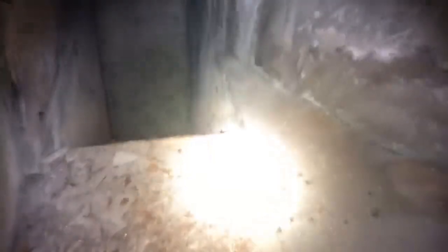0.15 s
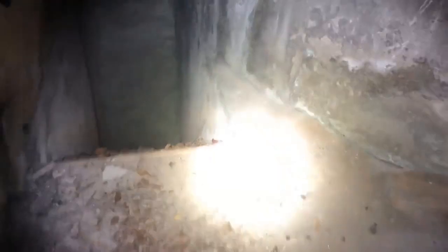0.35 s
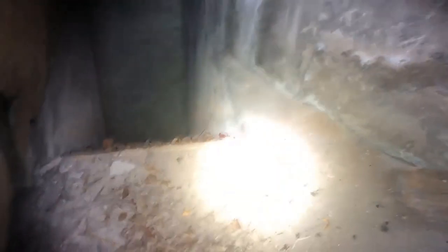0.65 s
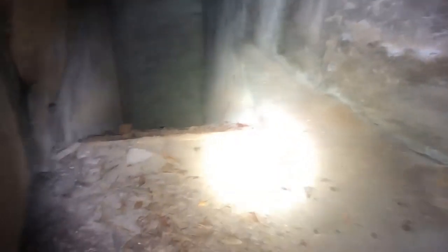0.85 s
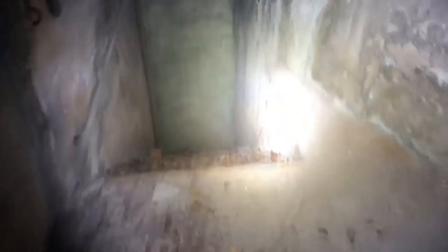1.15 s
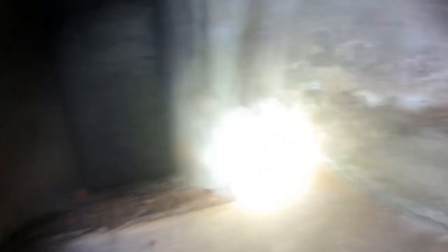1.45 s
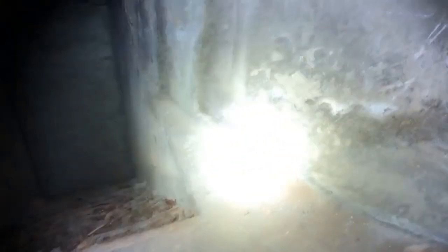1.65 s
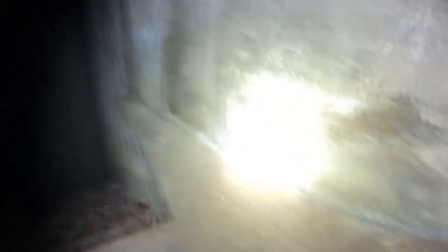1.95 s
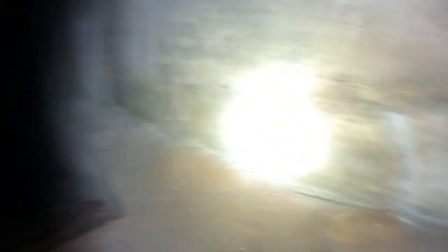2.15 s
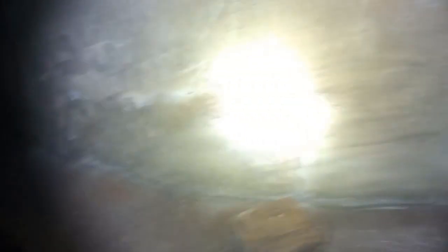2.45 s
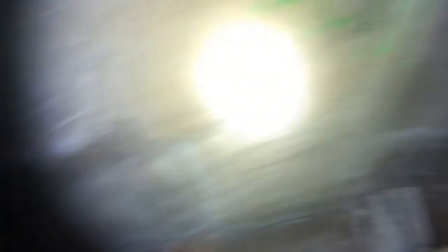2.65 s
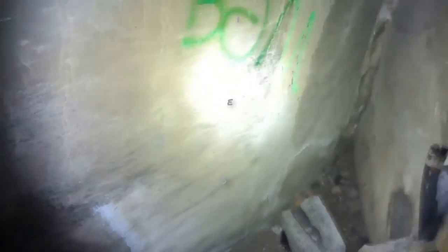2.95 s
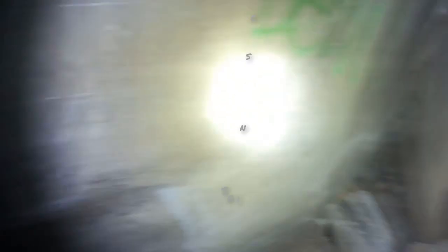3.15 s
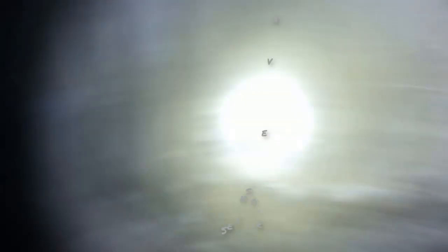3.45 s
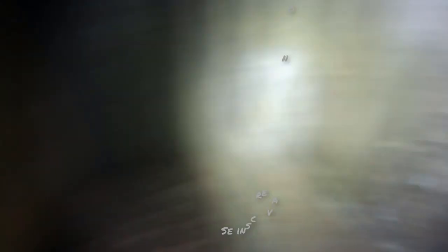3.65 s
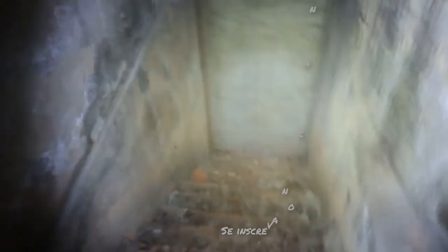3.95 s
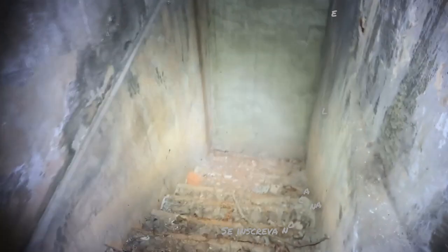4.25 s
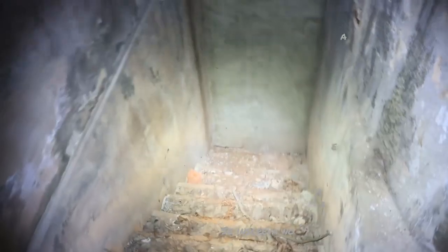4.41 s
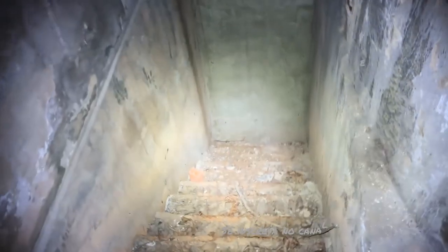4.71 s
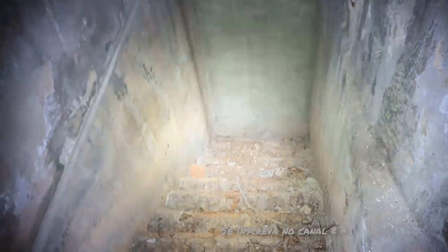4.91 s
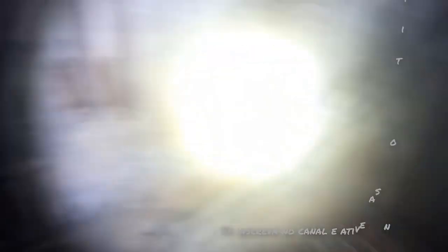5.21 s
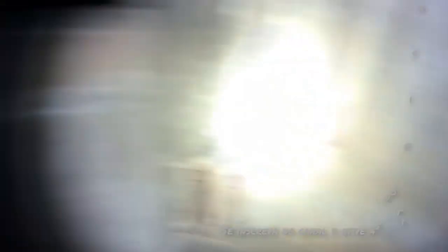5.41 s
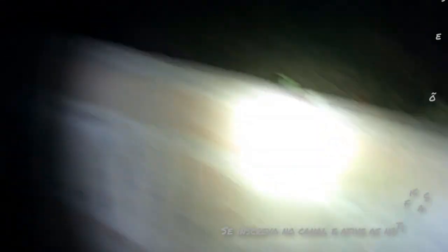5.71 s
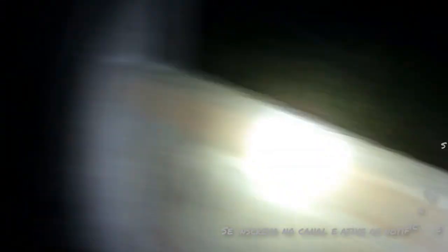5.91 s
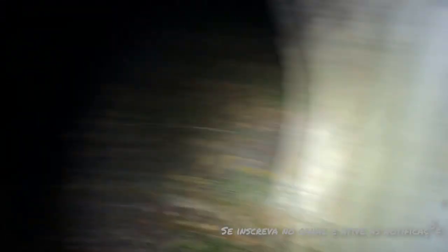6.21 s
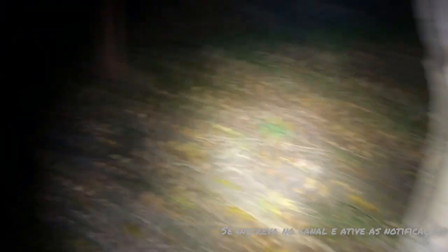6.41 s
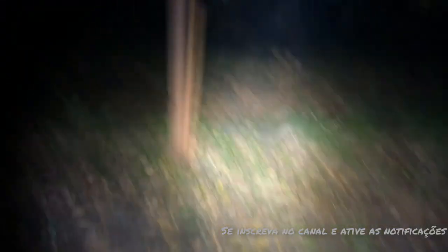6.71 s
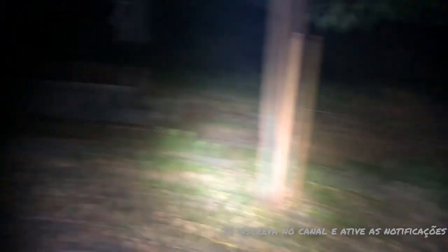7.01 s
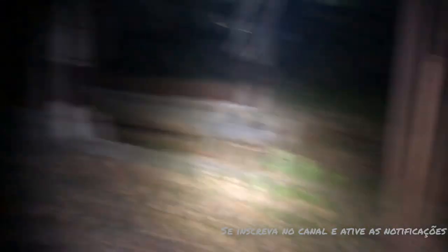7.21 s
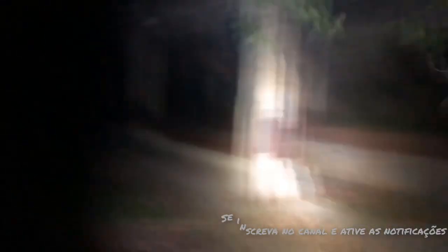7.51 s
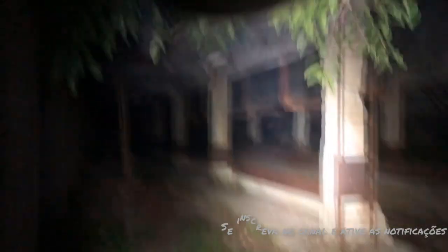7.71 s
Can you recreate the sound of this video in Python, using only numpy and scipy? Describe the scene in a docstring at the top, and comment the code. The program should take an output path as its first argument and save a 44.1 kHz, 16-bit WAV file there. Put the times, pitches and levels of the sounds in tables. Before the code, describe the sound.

Uneven footsteps crunch over rubble, twigs and dry leaves, with sharp little snaps and a faint low hum underneath.

```python
"""A wide crunch dies away, then footsteps go on in the middle, over rubble, twigs and dry leaves at night.
Each step crushes many small grains and rings the gap under the sole; some heels thump softly.
Twigs and chips snap singly, and bare walls answer with a short tail.
Under the quiet air a low hum wavers, with a few faint, thin tones."""
import sys
import numpy as np
from scipy import signal
from scipy.io import wavfile
from scipy.ndimage import uniform_filter1d

SR = 44100
rng = np.random.default_rng(int(sys.argv[2]) if len(sys.argv) > 2 else 0)


def wav_record(signal):
    """Record a signal, one row per channel, as 16-bit PCM in the file named by sys.argv[1]."""
    frames = np.transpose(np.atleast_2d(signal))
    bounded = np.clip(frames, -1, 1)
    # unit amplitude maps onto the largest positive 16-bit level
    quanta = np.round(bounded * 32767).astype(np.int16)
    wavfile.write(sys.argv[1], SR, quanta)


N = 346626
TIME_S = np.arange(N) / SR
EVENT_SAMPLES = 4000


def gain_of(db):
    """Decibels to gain."""
    return 10 ** (np.asarray(db) / 20)


def unit_rms(x):
    """Scales to rms 1."""
    return x / np.sqrt(np.mean(x ** 2) + 1e-20)


def at_pitch(points, hz):
    """Interpolates (hz, value) points on a log-frequency axis."""
    known_hz, values = np.transpose(points)
    return np.interp(np.log(hz + 1), np.log(known_hz + 1), values)


def follow(points):
    """Interpolates (time_s, value) points at each sample."""
    return np.interp(TIME_S, *np.transpose(points))


def drift(rate_hz):
    """Low-passed noise of rms 1."""
    lowpass = signal.butter(2, rate_hz, fs=SR, output="sos")
    return unit_rms(signal.sosfilt(lowpass, rng.standard_normal(N)))


def resonate(x, hz, width_hz):
    """Two-pole resonance."""
    r = np.exp(-np.pi * width_hz / SR)
    return signal.lfilter([1 - r, 0, r - 1], [1, -2 * r * np.cos(2 * np.pi * hz / SR), r * r], x)


# Ground giving way: full_load_s, rise_s, hold_s, leaves_db, fall_db_per_s,
# grit_re_leaves_db, fizz_re_leaves_db, hollow_hz
CRUSHES = [(0, 0.001, 0.015, -30.5, 287, -0.5, 3, 726), (0.177, 0.068, 0.0, -42.5, 386, -25, -8, 920.0),
           (0.31, 0.13, 0.016, -51.5, 97, -5, -8, 870), (0.46, 0.018, 0.11, -59.5, 440.0, -2.5, -15.5, 700),
           (0.801, 0.004, 0.039, -52.5, 317, -8, -23, 745), (0.945, 0.011, 0, -52, 310, 5, -3.5, 785),
           (1.13, 0.0059, 0.014, -45, 290, 0, -4.5, 1000),
           (1.282, 0.0022, 0.00028, -46, 508.5, -20, -7, 860.0),
           (1.337, 0.0037, 0.094, -39.5, 128, 1, 0, 920), (1.387, 0.045, 0.054, -29.5, 206, -5, -4, 695),
           (1.493, 0.022, 0.0093, -31, 379, -6.5, 1.5, 583),
           (1.63, 0.028, 0.026, -45.5, 145, -2.5, -11.5, 780),
           (1.79, 0.055, 0.036, -50, 286, -8.5, -8.5, 930), (1.956, 0.21, 0.0081, -55, 174, -2, -5, 940),
           (2.13, 0.11, 0.027, -54.5, 98, -24, -9.5, 740), (2.23, 0.033, 0.011, -60.5, 193, -12, -4, 800),
           (2.48, 0.05, 0.014, -54.5, 533, -18, -10, 785), (2.747, 0.096, 0.008, -57.5, 287, -21, -10, 864),
           (2.807, 0.008, 0.09, -56.5, 100.5, 3, -9, 900), (2.839, 0.0065, 0.019, -40, 103, 1, -4, 1110),
           (2.897, 0.046, 0.089, -49, 214, 6, -2.5, 880), (3.306, 0.14, 0.0085, -48.5, 159, -3, -3, 960),
           (3.402, 0.095, 0.013, -51, 228, -2.5, -2.5, 1020),
           (3.554, 0.004, 0.028, -56.5, 268, -9, -5, 910.0), (3.796, 0.005, 0, -63, 139, -7, -9.5, 850),
           (3.89, 0.033, 0.16, -64.5, 52, -2, -5, 875), (3.984, 0.024, 0.04, -49, 298, 8, -8, 760),
           (4.088, 0.034, 0.15, -57.5, 150.5, 1, -9.5, 990),
           (4.316, 0.06, 0.036, -54, 209, 1.5, -6.5, 1140), (4.472, 0.05, 0.04, -44, 265, -4.5, -6.5, 1080),
           (4.671, 0.0049, 0.012, -54, 506, -0.5, -26, 990),
           (4.852, 0.043, 0.052, -63, 240, -15, -7.5, 880),
           (5.137, 0.023, 0.048, -60.5, 133, -10, -5.5, 870.0), (5.26, 0.016, 0, -55.5, 249, -24, -10, 900),
           (5.425, 0.03, 0, -60, 594, -18, -4, 806), (5.675, 0.0018, 0.02, -47, 364, 2.5, -13.5, 1010),
           (5.755, 0.019, 0.0, -51, 101.5, 3.5, -15, 1000), (5.942, 0.064, 0.17, -58, 110, 3.5, -22, 1020),
           (6.099, 0.004, 0.057, -49.5, 169, 8, -13.5, 1130),
           (6.148, 0.0075, 0.008, -43, 267, -5, -10, 1350), (6.348, 0.0055, 0, -51, 133, 5, -14.5, 1480),
           (6.538, 0.064, 0.19, -59, 46, 9.5, -22, 1060), (6.761, 0.0065, 0.05, -50, 102, -10, -3.5, 1010),
           (6.826, 0.036, 0.02, -35, 225, -4.5, -1, 950), (6.939, 0.033, 0.014, -41.5, 282, -10, 2, 875),
           (7.14, 0.063, 0, -58, 59, -1, -4.5, 800), (7.331, 0.083, 0, -57.5, 43, 0.5, -8, 1000),
           (7.423, 0.035, 0.13, -49, 104, -8, -9.5, 860), (7.602, 0.043, 0.044, -43.5, 292, -3, -6.5, 1010),
           (7.68, 0.0099, 0.0013, -52, 107.5, 2, -4, 970), (7.726, 0.015, 0.22, -58.5, 95, 0.5, -3, 984)]


def foot_load():
    """Each crush rises, holds, falls and settles; returns the three debris levels and the hollow pitch."""
    rise_db, settle_speed = 17, 0.35
    sink_share, sink_s = 0.2, 0.18
    t = np.arange(0, N + 32, 32) / SR
    full_s, rise_s, hold_s, level_db, fall_db_per_s, grit, fizz, hz = np.transpose(CRUSHES)[:, :, None]

    def power(offset_db, fall_speed, lag_s=0, settle_db=-7):
        """Power per crush: the collapse plus the heap's fainter, slower settling."""
        since_s = t - full_s - lag_s * (full_s > 0)
        top_db = level_db + offset_db + rise_db * np.minimum(since_s, 0) / np.maximum(rise_s, 0.001)
        lost_db = fall_speed * fall_db_per_s * np.maximum(since_s - hold_s, 0)
        return gain_of(top_db - lost_db) ** 2 + gain_of(top_db + settle_db - settle_speed * lost_db) ** 2

    # Coarse grit gives way late and keeps rolling; fine fizz stops sooner.
    powers = power(0, 1), power(grit, 0.97, lag_s=0.009, settle_db=-8.5), power(fizz, 1.39)
    rests = gain_of([-79.5, -90.5, -91]) ** 2  # between steps
    leaves_db, grit_db, fizz_db = (10 * np.log10(p.sum(0) + rest) for p, rest in zip(powers, rests))
    # The hollow pitch drops as the foot presses the heap shut; crushes count by their grit power.
    sunk_hz = hz * (1 - sink_share * (1 - np.exp(-np.maximum(t - full_s, 0) / sink_s)))
    hollow_hz = ((powers[1] * sunk_hz).sum(0) + 700 * rests[1]) / gain_of(grit_db) ** 2
    curves = leaves_db, grit_db - leaves_db, fizz_db - leaves_db, hollow_hz
    return [np.interp(TIME_S, t, curve) for curve in curves]


# Grain spectrum: pitch_hz, level_db
GRAIN_SPECTRUM = [(300, -2.5), (550, -4.5), (900, -10), (1600, -0.5), (3000, -1.5), (5000, 1.5), (8000, 0),
                  (12000, 5), (15500, -2)]


def crunch(leaves_db, grit_db, fizz_db, hollow_hz):
    """Grains of many pitches break in clumps; grit sets the low end, fizz the top, relative to leaves."""
    grain_cycles, spread_db = 3.94, 0.94
    anchors_hz = 750, 3300, 11000  # grit, leaves, fizz
    clumps_db = 1.5 * drift(61)
    crowd = np.clip(gain_of(0.6 * (leaves_db + 54.5)), 1.1, 4)  # more load breaks more grains at once
    out = np.zeros(N)
    for hz in np.geomspace(310, 15500, 26):
        sizes = gain_of(spread_db * np.minimum(rng.exponential(1, N), 3)) * rng.standard_normal(N)
        t = np.arange(round(grain_cycles * SR / hz) + 4) / SR
        grain = np.sin(2 * np.pi * hz * t) * np.sin(np.pi * np.sqrt(t / t[-1])) ** 2
        breaks_per_s = 900 * crowd * (hz / 3000) ** 0.7
        breaks = rng.random(N) < breaks_per_s / SR
        train = signal.oaconvolve(sizes * breaks / np.sqrt(crowd), grain)[:N]
        grit_share = at_pitch(list(zip(anchors_hz, (0.99, 0.026, 0.085))), hz)
        fizz_share = at_pitch(list(zip(anchors_hz, (0.2, 0.033, 0.96))), hz)
        band_db = at_pitch(GRAIN_SPECTRUM, hz) + grit_share * grit_db + fizz_share * fizz_db
        # Grains near the hollow pitch sound louder; those below it radiate poorly.
        below = np.log(hollow_hz / hz)
        hollow_db = 2.94 * np.exp(-(below / 0.45) ** 2) - 7 * np.maximum(below, 0)
        patch_db = min(hz / 2500, 1) * clumps_db + 2 * drift(40.5)  # fine grains clump together
        out += unit_rms(train * gain_of(patch_db)) * gain_of(band_db + hollow_db)
    return gain_of(leaves_db - 9.5) * (out + hollow_ring(out, grit_db, hollow_hz))


def hollow_ring(grains, grit_db, hollow_hz, width_hz=200):
    """The gap under the sole rings at a moving pitch; coarser grit excites it more."""
    carrier = np.exp(2j * np.pi * np.cumsum(hollow_hz) / SR)
    r = np.exp(-np.pi * width_hz / SR)
    ring = 2 * (carrier * signal.lfilter([1 - r], [1, -r], grains / carrier)).real
    return gain_of(3 + 0.6 * np.minimum(grit_db, 6)) * ring


# Heel strikes: start_s, level_db, pitch_hz
HEELS = [(0.0, -32.5, 199), (0.012, -24, 600), (0.017, -30.5, 337), (0.726, -40, 120),
         (1.175, -40.5, 137.5), (1.244, -37, 102), (1.326, -38.5, 139), (1.473, -34, 182),
         (3.991, -37, 340), (6.037, -41.5, 116), (6.826, -41.5, 189), (7.15, -40.5, 115), (7.519, -43, 152),
         (7.617, -36.5, 145), (7.734, -40.5, 164)]


def heel_thumps():
    """A heel lands softly: one quickly damped low tone."""
    out = np.zeros(N + EVENT_SAMPLES)
    t = np.arange(EVENT_SAMPLES) / SR
    envelope = t / 0.0049 * np.exp(1 - t / 0.0034)
    for start_s, level_db, pitch_hz in HEELS:
        thump = gain_of(level_db) * envelope * np.sin(2 * np.pi * pitch_hz * t)
        out[round(start_s * SR):][:EVENT_SAMPLES] += thump
    return out[:N]


# Air spectrum: frequency_hz, relative_density_db
AIR_SPECTRUM = [(15, -42.5), (25, 4), (72, 8.5), (134, -7), (206, -5), (405, -12), (451, -13.5),
                (1290, -16.5), (2280, -26.5), (3160, -34), (10700, -40), (14800, -47), (16000, -67.5)]


def night_air(rms_db=-58.5, patch_db=1.6):
    """Quiet, dark noise with patches drifting in level, thinned below 110 Hz."""
    hz = np.fft.rfftfreq(1024, 1 / SR)
    real, imag, patches = rng.standard_normal((N // 256 + 5, len(hz), 3)).T
    patches = unit_rms(uniform_filter1d(uniform_filter1d(patches, 12, axis=0), 14, axis=1))
    shape = gain_of(at_pitch(AIR_SPECTRUM, hz)) * np.where(hz > 110, 1, 0.3)
    spectrum = (real + 1j * imag) * shape[:, None] * gain_of(patch_db * patches)
    air = signal.istft(spectrum, nperseg=1024, noverlap=768)[1][:N]
    return gain_of(rms_db) * unit_rms(air)


def wavering_tone(pitch_hz, waver_hz, rate_hz):
    """A sine of rms 1 whose pitch wanders."""
    return np.sqrt(2) * np.sin(2 * np.pi * np.cumsum(pitch_hz + waver_hz * drift(rate_hz)) / SR)


# Hum tones, the two main ones first: pitch_hz, waver_hz, offset_db
HUM_TONES = [(57.2, .5, -3), (73.8, 1.2, 0), (101.7, 2.96, -7), (37.8, 4.8, -12.5), (96.3, 2, -10)]
# Swell of the lower main tone: time_s, level_db
LOWER_SWELL = [(0.0, -49), (0.22, -52), (0.35, -63), (1.2, -58.5), (1.71, -64), (2.41, -72), (3.74, -64.5),
               (4.29, -60.5), (5.12, -53.5), (6.11, -68.5), (7.66, -55), (7.86, -66)]
# Swell of the upper main tone: time_s, level_db
UPPER_SWELL = [(0.0, -56), (0.22, -58.5), (1.05, -64), (1.12, -61), (1.42, -58), (1.49, -57), (1.62, -74),
               (1.86, -60.5), (3.39, -70), (3.48, -56.5), (4.49, -59.5), (4.6, -66), (4.88, -53.5),
               (4.92, -60), (5.58, -61.5), (5.65, -71), (5.82, -56), (6.04, -73), (6.11, -58.5),
               (6.44, -57), (6.61, -60), (6.89, -56), (7.05, -82), (7.11, -57), (7.66, -65), (7.86, -74)]


def low_hum():
    """Two low tones come and go; three fainter ones swell with them."""
    lower_db, upper_db = follow(LOWER_SWELL), follow(UPPER_SWELL)
    swells_db = [lower_db, upper_db] + 3 * [(lower_db + upper_db) / 2]
    out = np.zeros(N)
    for (pitch_hz, waver_hz, offset_db), swell_db in zip(HUM_TONES, swells_db):
        gain = gain_of(swell_db + offset_db + 2.2 * drift(6))
        out += gain * wavering_tone(pitch_hz, waver_hz, rate_hz=2.3)
    return out


# Faint tones above the hum: pitch_hz, level_db, fade_db_per_s
FAINT_TONES = [(181, -74, 1), (227.4, -73, 0), (302, -77.5, 0), (450, -68.5, 1.7)]


def thin_tones():
    """Faint tones waver in pitch and level; two slowly fade."""
    out = np.zeros(N)
    for pitch_hz, level_db, fade_db_per_s in FAINT_TONES:
        gain = gain_of(level_db - fade_db_per_s * TIME_S + 3 * drift(3))
        out += gain * wavering_tone(pitch_hz, waver_hz=1.5, rate_hz=3.01)
    return out


# Wall reverberation: frequency_hz, t60_s
WALL_DECAY = [(300, 0.3), (1000, 0.12), (4000, 0.11), (12000, 0.1)]


def walls(x):
    """Bare walls return a dense tail, each band dying at its own speed."""
    hz, t, spectrum = signal.stft(rng.standard_normal(SR // 2), SR, nperseg=256)
    decay = gain_of(-60 * t / at_pitch(WALL_DECAY, hz)[:, None])
    tail = signal.istft(spectrum * decay, SR, nperseg=256)[1]
    tail[:130] = 0  # the nearest wall answers after 3 ms
    return signal.fftconvolve(x, tail / np.linalg.norm(tail))[:N]


LEAD_IN_S = 200 / SR


def fracture(noise, t60_s):
    """A short swelling crackle, a sharp break, then smaller ones dying fast over a slower crumble."""
    t = np.arange(len(noise)) / SR - LEAD_IN_S
    swell = gain_of(-8.5 + 20 * t / 0.0017)
    fall_db = -60 * np.maximum(t, 0) / t60_s
    decay = gain_of(fall_db) + 0.037 * gain_of(0.68 * fall_db)
    burst = noise * np.where(t < 0, swell, decay)
    return np.where(abs(t) < 0.5 / SR, 5.0, burst)  # the break is one sample


# Twigs and chips breaking: break_s, ring_peak_db, ring_hz, width_ratio, knock_re_ring_db, tick_re_ring_db
TWIG_SNAPS = [(0.1305, -36, 1600, .49, -16, 9), (0.173, -26, 3470, 0.3, -12, 10),
              (0.296, -36, 2030, 0.4, -31, -22), (0.327, -37, 3680, 0.41, -2, -30),
              (0.417, -41.5, 9000, 0.68, -43, 4), (0.6589, -49.5, 4900, .6, -25, 6.5),
              (0.764, -43, 3480, 0.56, -1.5, -23), (0.8059, -29.5, 2820, 0.77, -22, -4.5),
              (0.9428, -31.5, 2140, 0.9, -3.5, 2), (1.071, -50, 4500, 0.8, -18, 8),
              (1.1289, -20, 2360, 0.33, -4.5, 2.5), (1.135, -24, 7600, 0.33, -30, 1),
              (1.191, -39.5, 3670, 0.35, -17, -30), (1.279, -34, 2980, 0.41, -18, 9),
              (1.337, -31, 5760, 0.35, -16, -5), (1.424, -25, 2700, 0.3, -14, -17),
              (1.487, -7, 4130, 0.5, -20, -3.5), (1.4881, -11.5, 2320, 1.7, -31, -3),
              (1.501, -17, 4270, .15, -28, -30), (1.518, -19, 4300, 0.2, -27, -30),
              (1.618, -44, 1680, 0.25, -23, -14), (1.6379, -20.5, 4070, 0.16, -45.5, -2.5),
              (1.6374, -29, 1550, 0.28, -28, -22), (1.7087, -34, 3700, 0.36, -16, 10.5),
              (1.7784, -47, 1980, 0.42, -21, 17), (1.807, -26.5, 1850, 0.38, -17, 6.5),
              (2.838, -26, 4250, 0.61, -14, -19), (2.8416, -26, 2260, 0.44, -15, -12),
              (2.8854, -35, 8000, .6, -35, -2), (2.933, -26, 12000, 0.72, -36, 5),
              (3.2988, -30, 1980, 0.71, -30, -30), (3.554, -34, 3570, 0.3, -9.5, -6),
              (3.9478, -39.5, 4500, 0.59, -9, -33), (3.993, -36, 2500, 1.2, 7, 8),
              (4.014, -42, 1100, 0.43, 13, -30), (4.117, -42.5, 2600, 0.7, -7, 15.5),
              (4.183, -41.5, 1760, 0.22, 5, -30), (4.207, -35.5, 8900, .6, -32, -11.5),
              (4.237, -38, 3130, 0.2, -8, -30), (4.3, -37.5, 3000, 0.47, -10, 0),
              (4.549, -35, 2900, 0.36, -3.5, -26), (4.669, -38.5, 2850, 0.4, -16, -33),
              (4.8055, -47, 5500, .8, -36, -6), (4.834, -38, 5300, 0.59, -31, 4),
              (4.8654, -42.5, 2360, 1.05, -11.5, -27), (5.6623, -24.5, 2700, 0.36, -11, -32),
              (5.6647, -23, 2580, 0.4, -29, -25), (5.6738, -28, 8800, 0.83, -35, 9),
              (5.7572, -37, 1690, 0.26, 2.5, -33), (5.761, -26, 3500, 0.25, -30, -4),
              (5.83, -47, 1670, .45, -13, -27), (5.894, -45, 1800, 0.17, 1, -30),
              (6.003, -43, 4000, 0.23, -30, -20), (6.026, -46, 4000, 0.38, -20, -10),
              (6.101, -44, 1600, .5, 9, -13), (6.1094, -32, 1230, 0.13, -14, -20),
              (6.1488, -27, 2120, 1.1, -8, -30), (6.193, -29, 3350, 0.12, -5.5, -6),
              (6.246, -49, 9000, .6, -28, 4), (6.349, -33, 2200, 0.7, 2, -7),
              (6.4055, -41, 7000, 0.66, -23, 9), (6.512, -46, 1800, 0.31, -12, -27),
              (6.819, -26.5, 5900, 0.31, -26, -11), (6.8305, -24.5, 1750, 0.35, -25, 11.5),
              (6.854, -29, 6790, 0.49, -26, -45.5), (6.9343, -30, 3300, 0.18, -16, -2),
              (6.954, -28, 3680, 0.16, -20.5, 3), (7.0479, -56, 8600, .6, -37, 3),
              (7.2007, -42.5, 7000, 0.55, -39, 8), (7.228, -38.5, 3900, 0.18, -13, 5),
              (7.3428, -40, 2040, 0.11, -2, -27), (7.3928, -37, 1800, 0.18, -3.5, -16),
              (7.468, -27, 3420, 0.38, -12, 6), (7.497, -39.5, 3400, .52, -22, -36),
              (7.5503, -36, 2380, 0.6, -27, -26), (7.5938, -33.5, 3280, 0.092, -3, -32),
              (7.613, -28, 1920, 1, -26, -30), (7.6328, -25.5, 3470, 0.25, -5.5, -30),
              (7.6427, -27.5, 3460, 0.13, -32, -30), (7.681, -29.5, 3260, 0.43, -26, 1),
              (7.685, -29, 3980, 0.24, -17, 2), (7.744, -37, 9000, .6, -35, 0),
              (7.7649, -37, 1860, 0.42, 1, -39), (7.7723, -38, 3200, 0.47, -15, -2),
              (7.8435, -37.5, 3800, 0.14, -10, -32)]


def twig_snaps(hollow_hz):
    """Each snap rings the piece briefly, over a dry tick and a knock from the rubble underneath."""
    out = np.zeros(N + EVENT_SAMPLES)
    treble = signal.butter(4, 7000, "high", fs=SR, output="sos")
    for break_s, peak_db, ring_hz, width_ratio, knock_db, tick_db in TWIG_SNAPS:
        noise, dust = rng.standard_normal((2, EVENT_SAMPLES))
        ring = resonate(fracture(noise, t60_s=0.012), ring_hz, width_ratio * ring_hz)
        ring = resonate(ring, ring_hz, 1.1 * ring_hz)
        knock_hz = 1.27 * hollow_hz[round(break_s * SR)]
        knock = resonate(fracture(noise, t60_s=0.025), knock_hz, width_hz=600)
        knock = resonate(knock, knock_hz, width_hz=1000)
        tick = signal.sosfilt(treble, fracture(dust, t60_s=0.015))
        start = round((break_s - LEAD_IN_S) * SR)
        for part, offset_db in (ring, 0), (knock, knock_db), (tick, tick_db):
            out[start:][:EVENT_SAMPLES] += gain_of(peak_db + offset_db) * part / abs(part).max()
    return out[:N]


# Left-right difference of the first crunch: time_s, gain_db
SIDE_FADE = [(0.0, -10), (0.13, -15.5)]


def scene():
    """Everything sits in the middle; only the first crunch differs between left and right."""
    leaves_db, grit_db, fizz_db, hollow_hz = foot_load()
    grains = crunch(leaves_db, grit_db, fizz_db, hollow_hz)
    impacts = heel_thumps() + twig_snaps(hollow_hz)
    reverb = gain_of(-11) * walls(grains) + gain_of(-10) * walls(impacts)
    middle = grains + impacts + reverb + night_air() + low_hum() + thin_tones()
    spread = 0.6 * grains + 2 * np.roll(grains, -211)  # leftward lean plus a decorrelating shifted copy
    side = spread * gain_of(follow(SIDE_FADE)) * (TIME_S < SIDE_FADE[-1][0])
    return np.array([middle + side, middle - side])


def record(dry):
    """A steep low-pass at 15.9 kHz."""
    lowpass = signal.firwin(511, 15900, window=("kaiser", 9), fs=SR)
    return signal.oaconvolve(dry, lowpass[None], "same")


dry = scene()
out = record(dry)
wav_record(out)
```